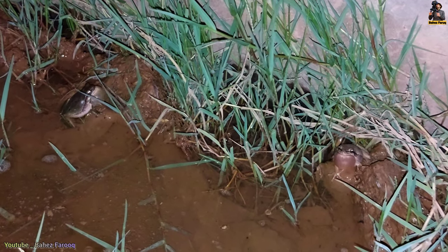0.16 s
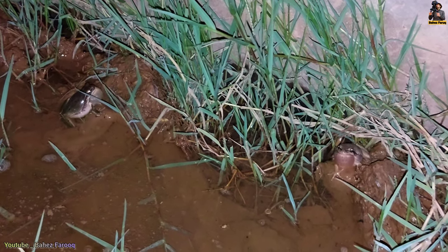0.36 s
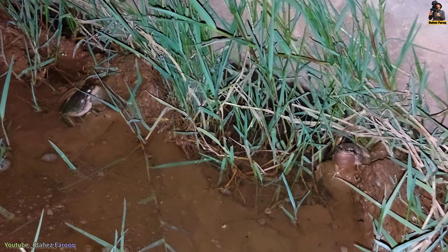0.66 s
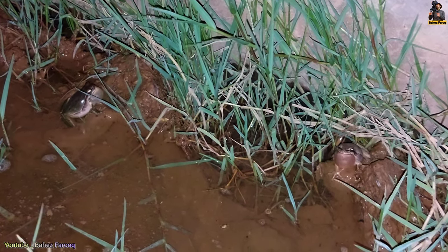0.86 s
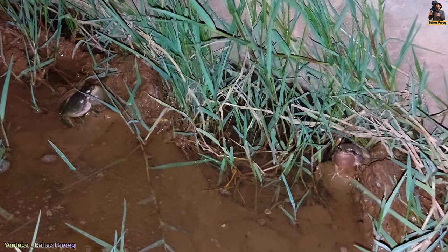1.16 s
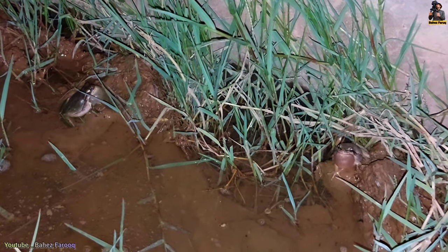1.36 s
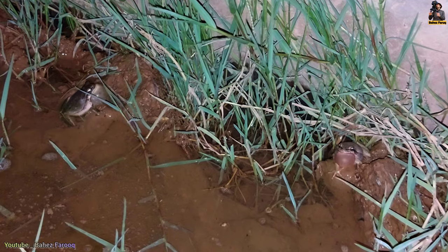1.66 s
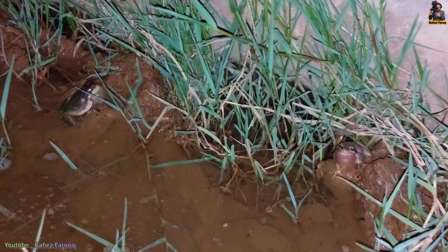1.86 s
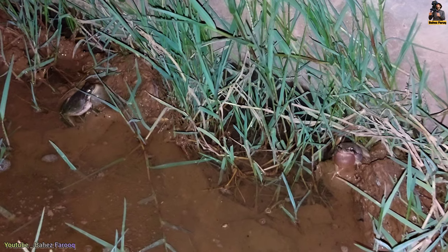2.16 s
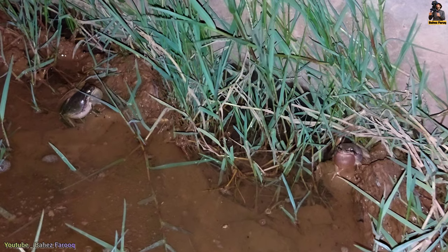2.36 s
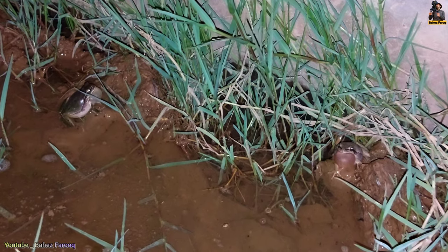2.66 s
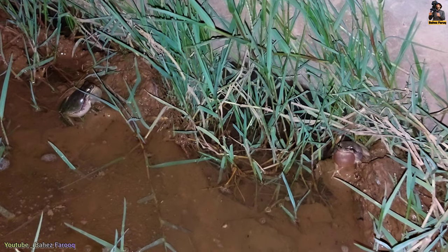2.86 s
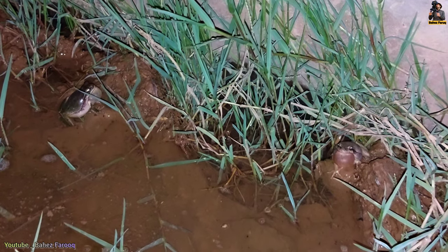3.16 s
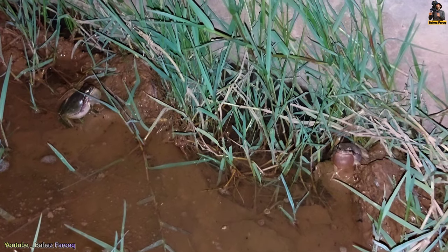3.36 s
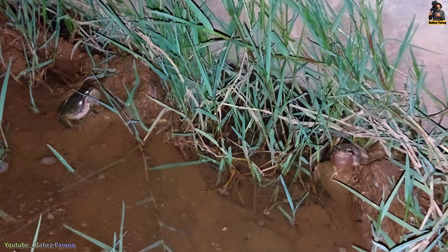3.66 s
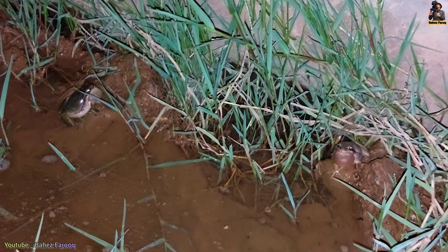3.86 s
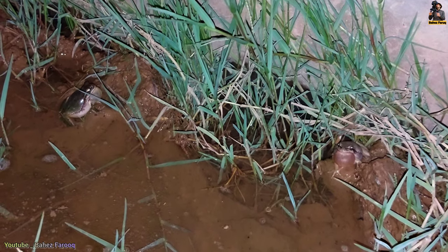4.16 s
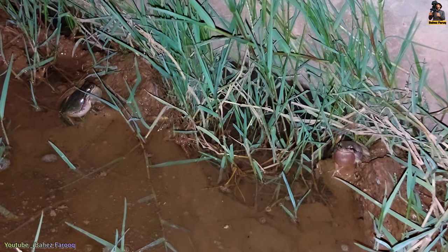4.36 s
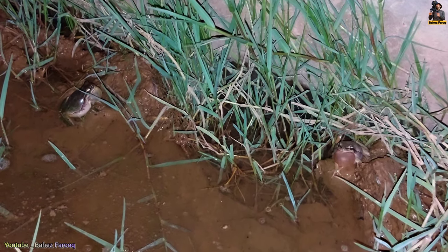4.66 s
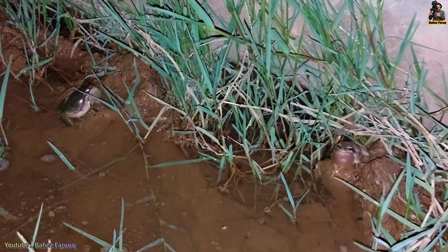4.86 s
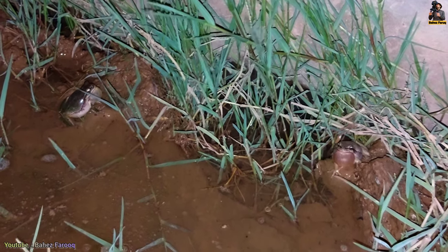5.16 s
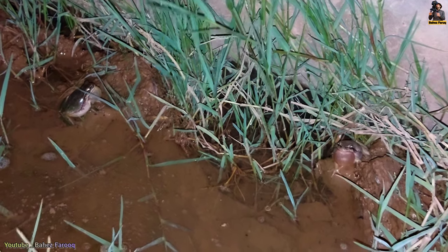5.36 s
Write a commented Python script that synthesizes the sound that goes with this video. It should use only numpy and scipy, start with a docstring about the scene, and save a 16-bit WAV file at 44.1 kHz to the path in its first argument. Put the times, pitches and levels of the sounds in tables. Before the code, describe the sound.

Beside a grassy puddle at night, a small frog close on the right gives loud, high beeps, about four a second, and stops about halfway through. Other frogs beep softly further off, while one rattles in short runs of harsh croaks. Both grow louder toward the end. A light breeze rumbles on the microphone over a faint hush of air.

```python
"""A light breeze rumbles on the microphone, with faint frog beeps beyond it: a grassy puddle at night.
One frog, close on the right, beeps loudly: each note is a quick train of pulses that ring its vocal sac,
gliding up. Others answer from further off, one rattles in runs of harsh croaks that gather strength and
then sag, and a soft hoot sounds once. Bank and grass scatter the calls over the hush of the night air."""
import sys
import numpy as np
from scipy import signal
from scipy.fft import rfft, irfft
from scipy.io import wavfile
from scipy.ndimage import uniform_filter1d, minimum_filter1d

SR = 44100
rng = np.random.default_rng(int(sys.argv[2]) if len(sys.argv) > 2 else 0)


def file_out(sig):
    """Save sig as 16-bit WAV at sys.argv[1]."""
    # one column per channel
    cols = np.atleast_2d(sig).T
    # limit, then scale
    lim = np.clip(cols, -1, 1)
    pcm = np.round(lim * 32767).astype(np.int16)
    wavfile.write(sys.argv[1], SR, pcm)


N = 242991
T = np.arange(N) / SR


def amp(db):
    """Decibels to gain."""
    return 10 ** (np.asarray(db) / 20)


def unit(x):
    """Scale to an rms of 1."""
    return x / np.sqrt(np.mean(x ** 2) + 1e-18)


def add(track, start_s, sound):
    """Mix a sound into a track at a time."""
    i = int(round(start_s * SR))
    a, b = max(i, 0), min(i + len(sound), N)
    if b > a:
        track[a:b] += sound[a - i:b - i]


def colour(x, points, size=4096):
    """Causal, minimum-phase filter through (freq_hz, gain_db) points."""
    hz, db = np.transpose(points)
    log_hz = np.log(np.fft.rfftfreq(size, 1 / SR) + 1)
    log_gain = np.log(amp(np.interp(log_hz, np.log(hz), db)))
    cepstrum = irfft(log_gain)[:size // 2]
    cepstrum[1:] *= 2
    return signal.fftconvolve(x, irfft(np.exp(rfft(cepstrum, size))))[:len(x)]


def stereo_noise(spectrum):
    """Coloured noise of rms 1, independent at the microphone's left and right ports."""
    return np.array([unit(colour(noise, spectrum)) for noise in rng.standard_normal((2, N))])


def swell(t, peak_s, order=1):
    """A rounded rise to 1 at peak_s, then an exponential fall."""
    u = np.maximum(t, 0) / peak_s
    return (u * np.exp(1 - u)) ** order


def scatter(x, delay_s, t60_s):
    """Dense echoes that die away, different at each port."""
    t = np.arange(SR // 2) / SR - delay_s
    tails = rng.standard_normal((2, len(t))) * (t > 0) * np.exp(-np.log(1000) * np.abs(t) / t60_s)
    return np.array([signal.fftconvolve(x, tail / np.linalg.norm(tail))[:N] for tail in tails])


def placed(x, left_db, grass_db, grass_t60_s, tail_db, tail_t60_s, lag_s=0):
    """Direct sound, lag_s later on the left; quick scatter off bank and grass; the surroundings' tail."""
    left = irfft(rfft(x) * np.exp(-2j * np.pi * np.fft.rfftfreq(N, 1 / SR) * lag_s), N)
    direct = np.array([amp(left_db) * left, x])
    grass = amp(grass_db) * scatter(x, delay_s=.00075, t60_s=grass_t60_s)
    tail = amp(tail_db) * scatter(x, delay_s=.017, t60_s=tail_t60_s)
    return direct + grass + tail


def breeze(gain_db=3.5, flow_pan_db=-9, buffet_db=3.5, eddy_s=.027):
    """A steady flow and a few gusts on the microphone; eddies buffet each port, mostly the right."""
    # strength of the steady flow: time_s, level_db
    flow = [(0, -33), (.35, -42), (.55, -48), (.88, -52.5), (1.05, -49.5), (1.55, -39), (1.95, -45.5),
            (2.5, -40.5), (2.6, -63.5), (2.8, -60.5), (2.92, -51.5), (3.4, -48), (3.68, -56.5),
            (3.85, -41.5), (4.5, -40), (5.5, -39.5)]
    # gusts on top of it: peak_s, half_length_s, level_db, left_minus_right_db
    gusts = [(0.147, 0.015, -31.5, -7.5), (0.326, 0.019, -24, -28.5), (1.539, 0.018, -36.5, 3.5),
             (2.42, 0.058, -31.5, -19.5), (3.249, 0.014, -38.5, -19), (3.885, 0.057, -22, -28),
             (4.02, 0.027, -23.5, -5), (4.311, 0.013, -32.5, -18), (4.637, 0.021, -25, -11),
             (5.374, 0.04, -32.5, -14.5)]
    # spectrum of wind on the ports: freq_hz, gain_db
    rumble = [(12, -56.5), (20, -31), (54, -0.5), (88, 1), (156, -6), (226, -17), (342, -18.5),
              (381, -26.5), (800, -50.5), (1040, -85.5), (1760, -120)]

    def ports(pan_db):
        """Share of the power at each port, for a level of left minus right."""
        share = amp(np.array([[pan_db], [-pan_db]]))
        return share / share.sum()

    power = ports(flow_pan_db) * amp(np.interp(T, *np.transpose(flow))) ** 2
    for peak_s, half_s, db, pan_db in gusts:
        gust = amp(db) * np.exp(-((T - peak_s) / half_s) ** 2 / 2)
        power += ports(pan_db) * gust ** 2
    wind = np.sqrt(power) * stereo_noise(rumble)
    knots = np.arange(0, N / SR, eddy_s)
    eddies = np.array([np.interp(T, knots, chance) for chance in rng.standard_normal((len(knots), 2)).T])
    return amp(gain_db + buffet_db * eddies) * wind


def night_air():
    """A faint hush all around; its level dips from about 2.4 s to 3.7 s, then comes back up."""
    # spectrum of the still air: freq_hz, gain_db
    spectrum = [(100, -13), (300, -11), (600, -9.5), (1300, 5), (2000, 6.5), (2800, 10), (4500, -20),
                (7000, -14), (9000, -26.5), (15000, -40)]
    # strength of the hush: time_s, level_db
    hush = [(0, -56), (2.4, -51.5), (2.8, -60), (3.65, -65.5), (4.1, -48.5), (5.5, -49)]
    return amp(np.interp(T, *np.transpose(hush))) * stereo_noise(spectrum)


def beeps(notes, peak_s, scoop_s, attack_s, release_s, slip_rad, body_db, rasp_db, climb_per_s=.35):
    """The sac whistles, climbing in pitch as it tightens; the larynx chops the whistle into pulses."""
    # the whistle and its weak, mostly inharmonic partials: pitch_ratio, level_db
    partials = [(.53, -30), (1, 0), (1.43, -32), (2.02, -40), (2.43, -29)]
    # what the body radiates at each pulse, beside the sac: freq_hz, gain_db
    body = [(90, -29.5), (175, 4), (350, -5), (480, -22.5), (800, -22.5), (1100, 4.5), (1600, 7.5),
            (2050, -4.5), (3500, 8), (4200, -1), (5000, -14), (7300, -12.5), (8600, -46.5), (10500, -54.5),
            (12500, -26), (15500, -43.5)]
    sac, clicks, airflow = np.zeros((3, N))
    t = np.arange(SR // 100) / SR
    for start, length, pulse_hz, sac_hz, db, scoop in notes:
        spacing, push, drift, snap = rng.standard_normal((48, 4)).T
        # two feeble pulses lead in, and the spacing wanders
        ages = (np.arange(48) - 2 + np.cumsum(.025 * spacing)) / pulse_hz
        # the whistle slips a little in phase from pulse to pulse
        slips = slip_rad * np.cumsum(drift)
        pulses = zip(ages[ages < length + release_s], slips, 1.4 * push, 1.4 * snap)
        for age, slip, push_db, click_db in pulses:
            opening = 1 / (1 + np.exp(.9 - 4 * age / attack_s))
            closing = 1 / (1 + np.exp(1.6 + 4 * (age - length) / release_s))
            effort = opening * closing
            size = amp(db + push_db) * effort
            # a quick scoop up to pitch, on top of a slow climb; both are shares of the pitch
            note_t = age + t
            scooping = scoop * scoop_s * np.exp(-note_t / scoop_s)
            climbing = climb_per_s * (note_t - length / 2) ** 2 / 2
            phase = 2 * np.pi * sac_hz * (note_t + scooping + climbing)
            whistle = sum(amp(level) * np.sin(ratio * phase + slip) for ratio, level in partials)
            add(sac, start + age - .0009, size * swell(t, peak_s, order=4) * whistle)
            add(clicks, start + age + .0007, [size * amp(click_db)])
            # weak pulses are the raspiest
            add(airflow, start + age, amp(db) * effort ** .24 * swell(t, peak_s=.0054))
    rasp = amp(rasp_db) * airflow * rng.standard_normal(N)
    return sac + colour(amp(body_db) * clicks + rasp, body)


def far_frogs(length_s=.0779, pulse_hz=176, sac_hz=2800, scoop=.06):
    """Beeps from further off, all of one length and pitch, soft and blurred by echoes."""
    # answering notes: start_s, relative_level_db
    answers = [(-0.03, -45.5), (0.048, -41.5), (0.586, -35.5), (0.781, -36.5), (1.055, -34.5),
               (1.225, -40.5), (1.489, -46.5), (1.766, -39.5), (2.635, -43.5), (2.773, -38.5),
               (2.896, -42.5), (3.059, -43.5), (3.31, -36.5), (3.554, -36.5), (3.744, -42.5), (3.817, -31),
               (3.937, -36), (4.046, -25), (4.124, -36.5), (4.296, -20), (4.46, -24), (4.675, -27),
               (4.825, -34.5), (4.907, -25), (5.064, -31.5), (5.163, -25.5), (5.387, -21.5)]
    notes = [(start, length_s, pulse_hz, sac_hz, db, scoop) for start, db in answers]
    voice = beeps(notes, peak_s=.0018, scoop_s=.022, attack_s=.0088, release_s=.0071,
                  slip_rad=.8, body_db=0, rasp_db=-37)
    return amp(7.5) * placed(voice, left_db=-3, lag_s=.0001,
                             grass_db=0, grass_t60_s=.061, tail_db=-4, tail_t60_s=.15)


def near_frog(level_db=-.16, scoop=.1, slacken_s=.02):
    """Loud, dry beeps from the puddle's edge; a note scoops up only if the sac has had time to slacken."""
    # the close frog's notes: start_s, length_s, pulse_rate_hz, sac_pitch_hz
    calls = [(0.1488, 0.08, 169.4, 2911), (0.3996, 0.092, 178.9, 2969), (0.6591, 0.088, 176.6, 2953),
             (0.9006, 0.087, 177.2, 2945), (1.1534, 0.087, 177.2, 2941), (1.3743, 0.089, 174.4, 2940),
             (1.5666, 0.051, 188.1, 2785), (1.616, 0.053, 179.1, 2935), (1.8613, 0.08, 167.8, 2876),
             (2.108, 0.082, 176.3, 2912), (2.4851, 0.074, 168.4, 2897)]
    notes, last_end = [], -np.inf
    for start, length, pulse_hz, sac_hz in calls:
        rested = start - last_end > slacken_s
        notes.append((start, length, pulse_hz, sac_hz, level_db, scoop if rested else 0))
        last_end = start + length
    voice = beeps(notes, peak_s=.002, scoop_s=.012, attack_s=.016, release_s=.013,
                  slip_rad=.6, body_db=3, rasp_db=-28.5)
    return placed(voice, left_db=-1.5, lag_s=.00025,
                  grass_db=-20, grass_t60_s=.032, tail_db=-19, tail_t60_s=.2)


def croaks(beat_s=.0612, settle_croaks=.87, last_hurry=.416, fill_hz=2410, sag_hz=1916):
    """A run hurries in, holds its beat and hurries out; its ends are weaker and longer, the last lower."""
    # runs of the rattling frog:
    # start_s, croak_count, first_hurry_share, tiring_croaks, full_pitch_hz, level_db, swell_db
    runs = [(0.647, 8, 0.55, .64, 2430, -28.5, 2.5), (1.988, 10, 0.68, 2.6, 2284, -29.5, 2),
            (3.124, 9, 0.56, 1.47, 2200, -25, 4.5), (4.257, 9, .37, .96, 2667, -14.5, 3),
            (4.785, 3, 0.2, 1, 2120, -35, 4.5), (5.339, 9, 0.56, 2.8, 2780, -13.5, 7.5)]
    rows = []
    for start, count, hurry, tiring, full_hz, db, swell_db in runs:
        k = np.arange(int(round(count)))
        hurry_in = hurry * np.exp(-k[:-1] / settle_croaks)
        hurry_out = last_hurry * np.exp(-k[:-1][::-1] / tiring)
        middles = start + beat_s * np.append(0, np.cumsum(1 - hurry_in - hurry_out))
        # the sac fills over the first croaks and empties over the last
        filling = np.exp(-(k / 1.3) ** 2)
        sagging = np.exp(-(k[::-1] / 1.7) ** 2)
        lengths_s = .032 + .013 * filling + .016 * sagging
        pitches_hz = full_hz + (fill_hz - full_hz) * filling + (sag_hz - full_hz) * sagging
        levels_db = db + swell_db * (k / k[-1] - .5) - 3 * filling - 9.5 * sagging
        detune, push_db = rng.standard_normal((len(k), 2)).T
        rows += zip(middles, lengths_s, pitches_hz * (1 + .045 * detune), levels_db + push_db)
    return rows


def rattling_frog(snap_hz=310, jitter=.22, upper_db=-17, rasp_db=-31, throat_db=10, modes_db=-9):
    """Each croak is a burst of uneven snaps, which sound the throat and ring the sac."""
    # broad response of the throat: freq_hz, gain_db
    throat_shape = [(200, -31.5), (330, -6), (470, 12), (620, -16.5), (820, 4), (1250, -3), (1900, -0.5),
                    (3600, 19.5), (4900, -4), (5500, -13), (7300, -48.5), (8300, -38), (9500, -34),
                    (10600, -37), (12500, -42), (15000, -25.5)]
    # narrow resonances of the head and sacs: pitch_hz, width_hz, level_db
    head_modes = [(2400, 230, -31.5), (2530, 15, 10), (3065, 29, 4.5), (3230, 44, -23.5), (3253, 22, 1),
                  (3920, 25, -25), (3900, 240, -10), (4520, 16, -30), (4700, 110, -37.5), (5000, 23, -32)]
    sac, throat = np.zeros((2, N))
    t = np.arange(SR // 25) / SR

    def ring(hz, rise_s):
        """A short resonance of unit energy."""
        wave = swell(t, rise_s) * np.sin(2 * np.pi * hz * t)
        return wave / np.linalg.norm(wave)

    for middle, length, hz, db in croaks():
        snap_s = np.cumsum(np.abs(1 + jitter * rng.standard_normal(64))) / snap_hz
        snap_s = snap_s[snap_s < 2 * length]
        # the push of air swells and tapers around the middle of the croak
        snaps = np.zeros(int(2 * length * SR) + 1)
        snaps[(snap_s * SR).astype(int)] = np.exp(-((snap_s / length - 1) / .35) ** 2)
        snaps = unit(snaps) / np.sqrt(2)
        # a thin upper mode follows the tension of the sac only a little
        upper_hz = 4820 * (hz / 2250) ** .18
        rings = ring(hz, rise_s=.00091) + amp(upper_db) * ring(upper_hz, rise_s=.0028)
        add(sac, middle - length, amp(db) * signal.fftconvolve(snaps, rings))
        drive_db = -42.5 + .94 * (db + 20)  # the throat grows almost in step with the sac
        add(throat, middle - length, amp(drive_db) * snaps)
    # a puff of air follows each snap
    puffs = signal.fftconvolve(throat, swell(t, peak_s=.0005))[:N]
    throat += amp(rasp_db) * puffs * rng.standard_normal(N)
    modes = sum(amp(db) * width / 100 * np.exp(-np.pi * width * t) * np.sin(2 * np.pi * hz * t)
                for hz, width, db in head_modes)
    head = amp(modes_db) * signal.fftconvolve(throat, modes)[:N]
    voice = sac + amp(throat_db) * colour(throat, throat_shape) + head
    return placed(voice, left_db=2, grass_db=-7, grass_t60_s=.041, tail_db=-7.5, tail_t60_s=.18)


def hoot(rise_share=.18):
    """A short, soft tone that climbs a little, under one of the close beeps."""
    # the low hoot: start_s, length_s, pitch_hz, level_db
    tones = [(1.555, 0.081, 1108, -29)]
    voice = np.zeros(N)
    for start, length, hz, db in tones:
        t = np.arange(int(length * SR)) / SR
        pitch_hz = hz * (1 + rise_share * (t / length - .5))
        envelope = swell(t, peak_s=.26 * length) * (1 - (t / length) ** 4)
        add(voice, start, amp(db) * envelope * np.sin(2 * np.pi * np.cumsum(pitch_hz) / SR))
    return placed(voice, left_db=-8, grass_db=0, grass_t60_s=.087, tail_db=-30, tail_t60_s=.36)


def scene():
    """The frogs sit to the right of the microphone, which shades their treble from its left port."""
    # response of the port that faces away from the frogs: freq_hz, gain_db
    left_shade = [(100, -21), (600, 4), (1300, -5), (2500, -11.5), (4400, -18), (8000, -31.5), (15000, -29)]
    left, right = near_frog() + far_frogs() + rattling_frog() + hoot() + night_air()
    return np.array([colour(left, left_shade), right]) + breeze()


def record(dry):
    """A smooth limiter holds the peaks under full scale; the top is cut."""
    ceiling, top_hz = .97, 15900
    needed_gain = ceiling / np.maximum(np.abs(dry).max(axis=0), ceiling)
    held_gain = minimum_filter1d(needed_gain, size=256)
    gain = uniform_filter1d(uniform_filter1d(held_gain, size=128), size=128)
    lowpass = signal.ellip(8, .2, 70, top_hz, fs=SR, output="sos")
    return signal.sosfilt(lowpass, gain * dry)


dry = scene()
out = record(dry)
file_out(out)
```